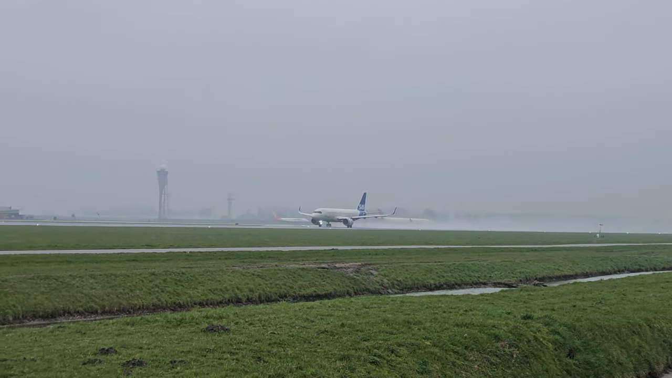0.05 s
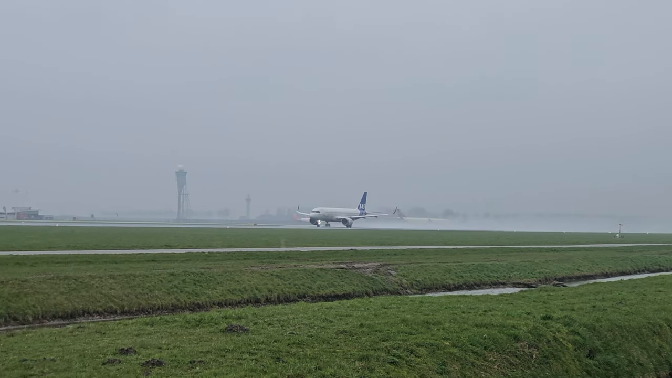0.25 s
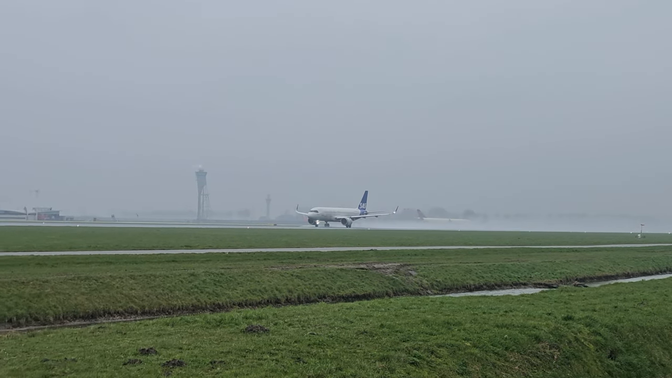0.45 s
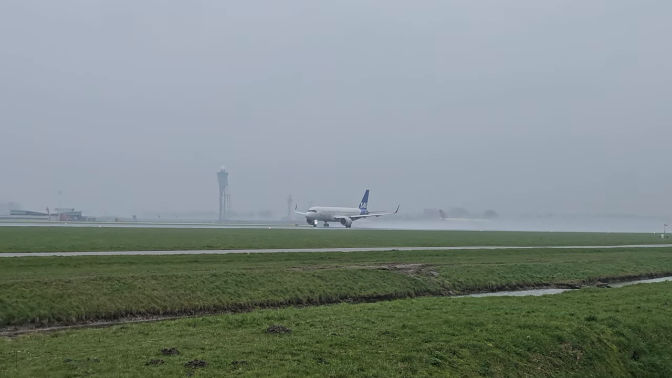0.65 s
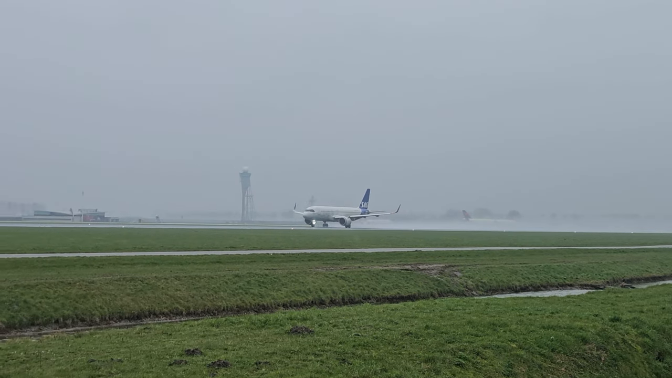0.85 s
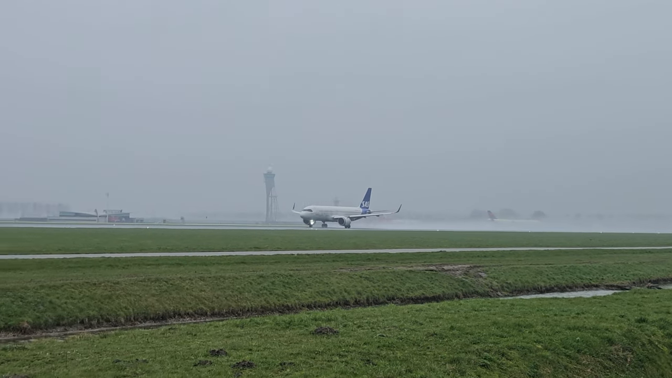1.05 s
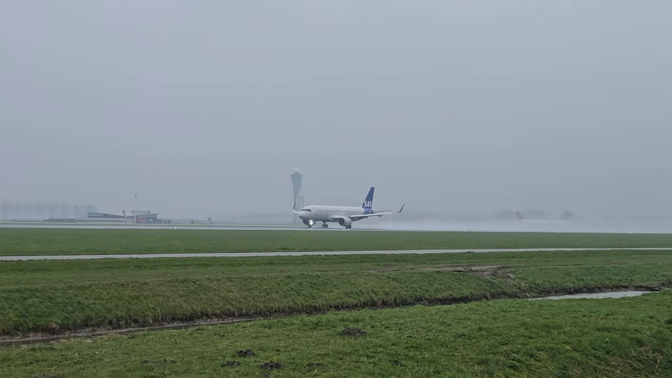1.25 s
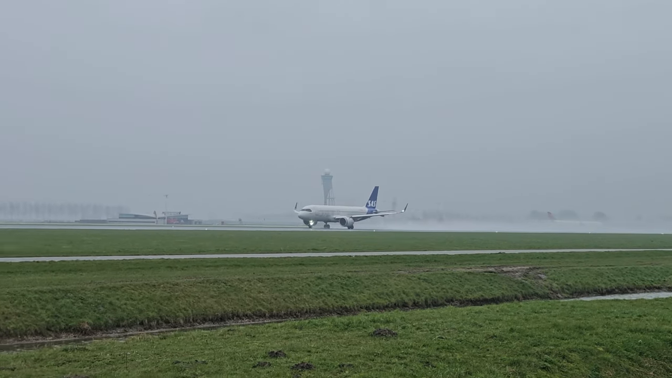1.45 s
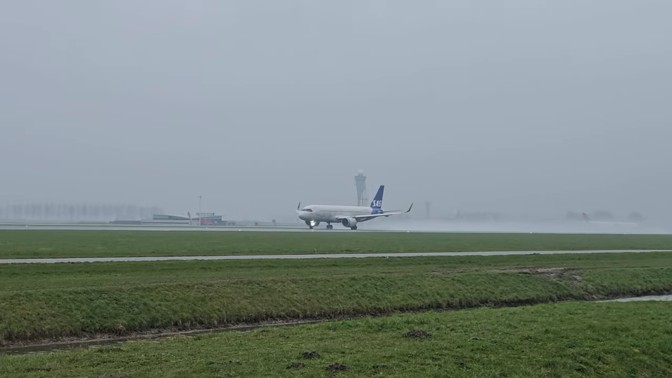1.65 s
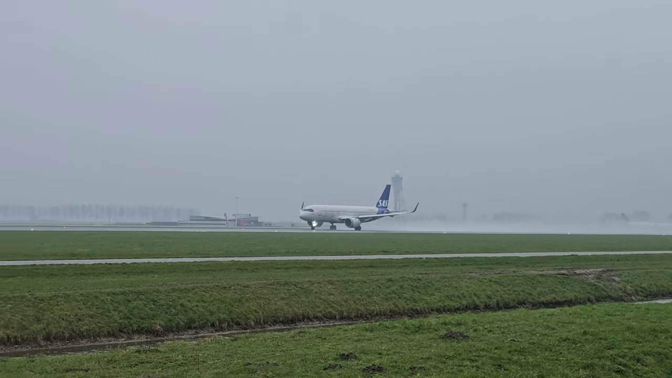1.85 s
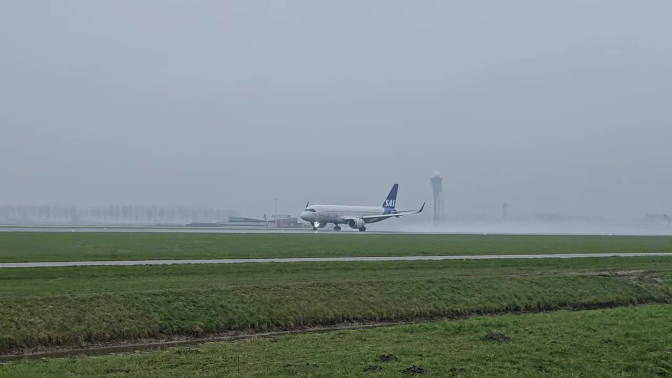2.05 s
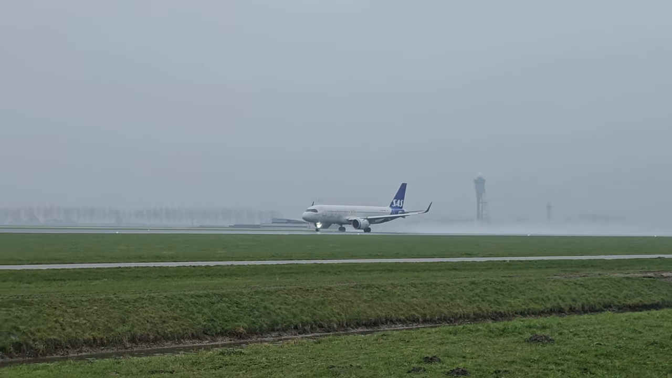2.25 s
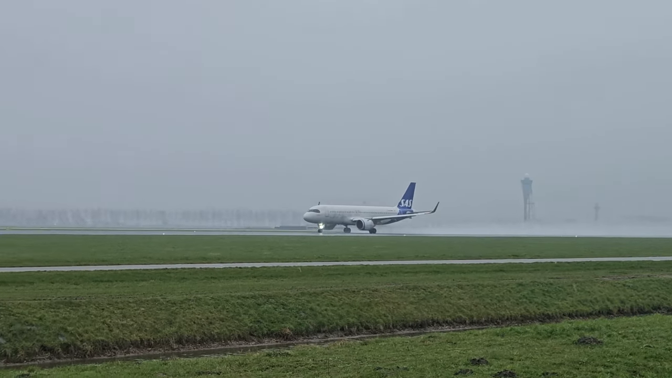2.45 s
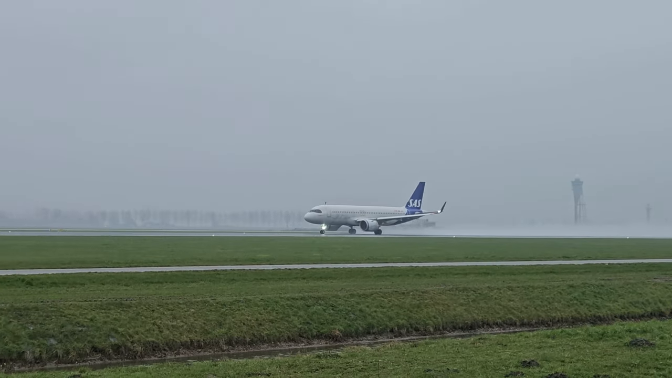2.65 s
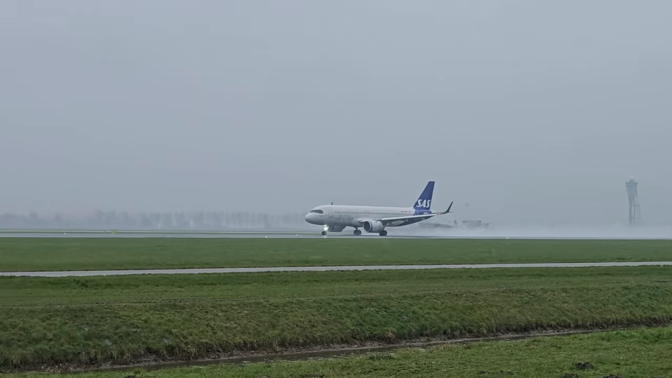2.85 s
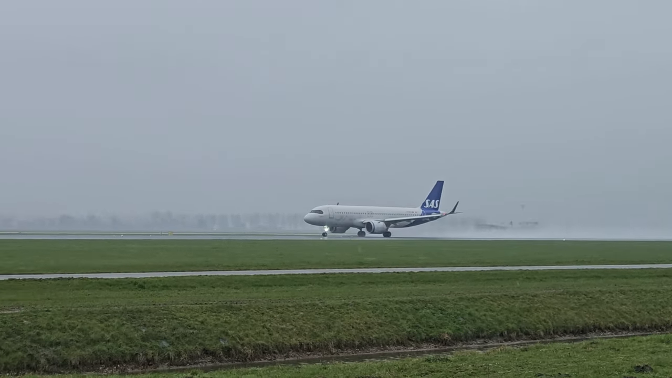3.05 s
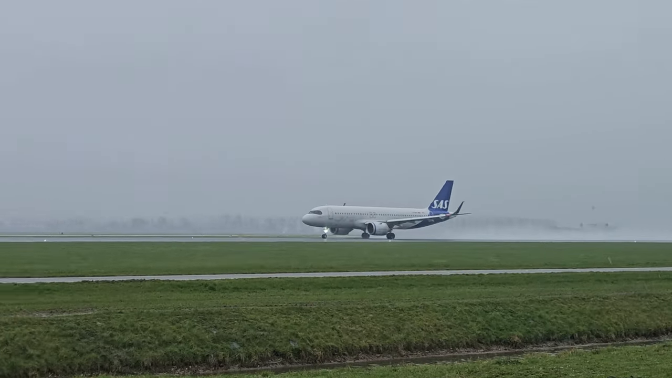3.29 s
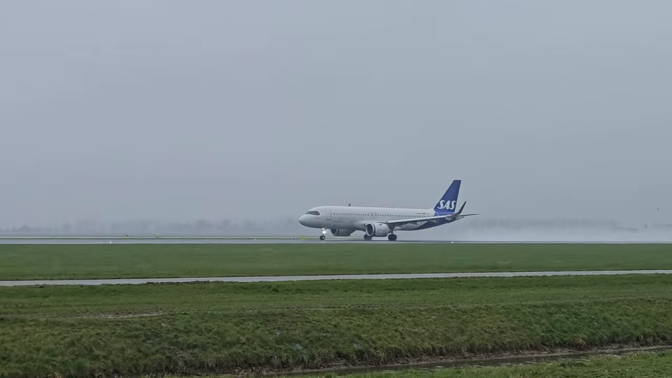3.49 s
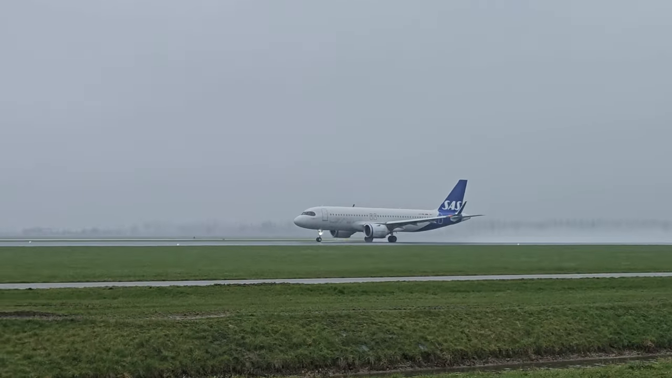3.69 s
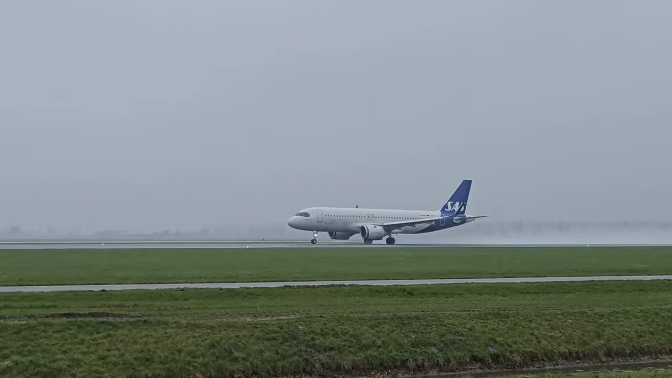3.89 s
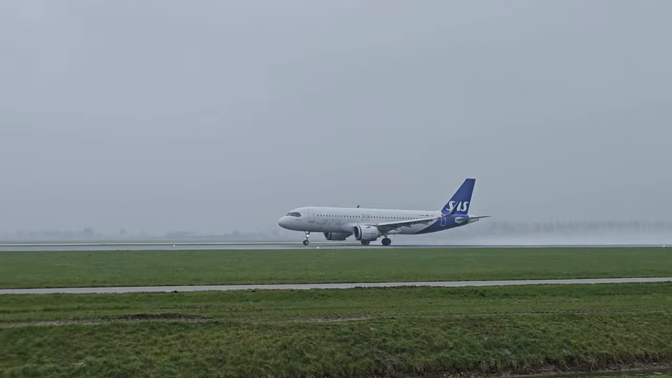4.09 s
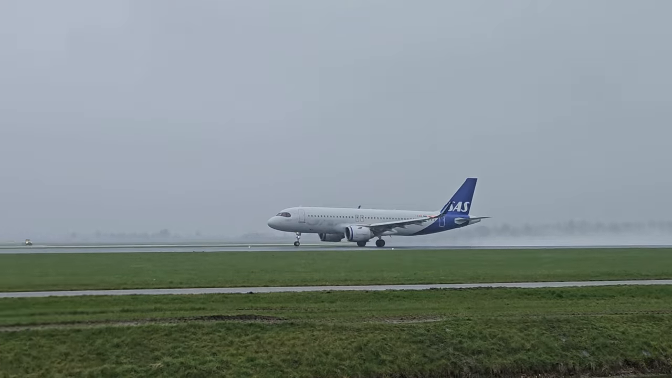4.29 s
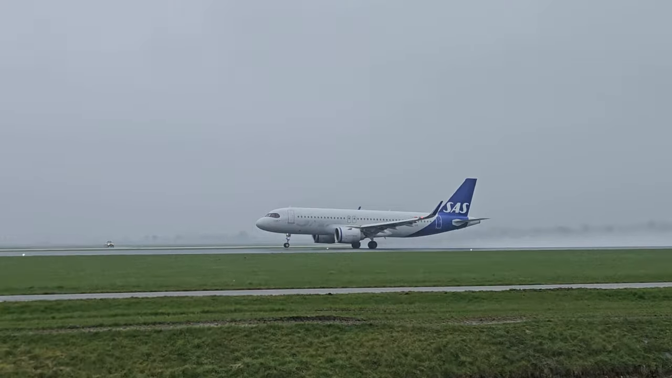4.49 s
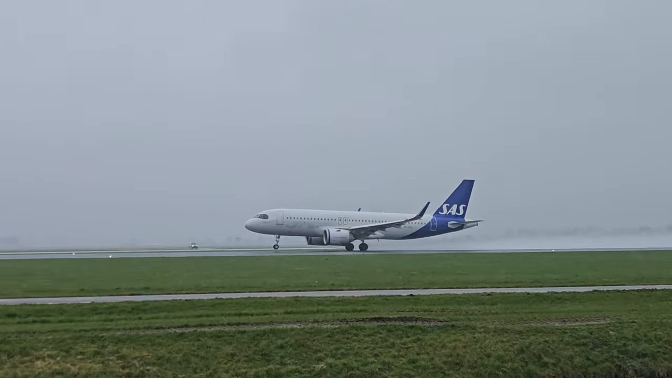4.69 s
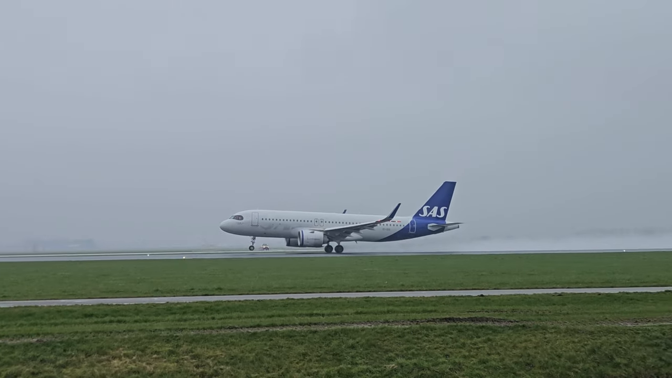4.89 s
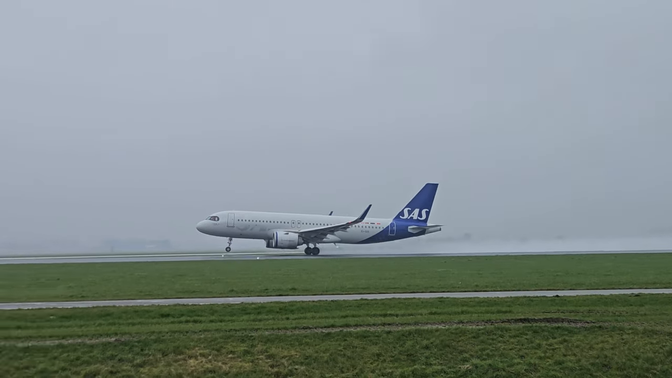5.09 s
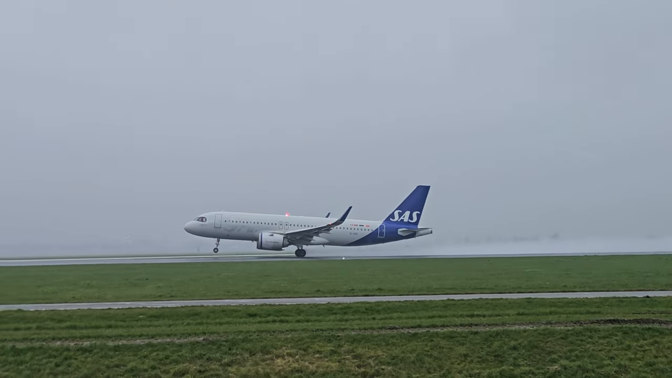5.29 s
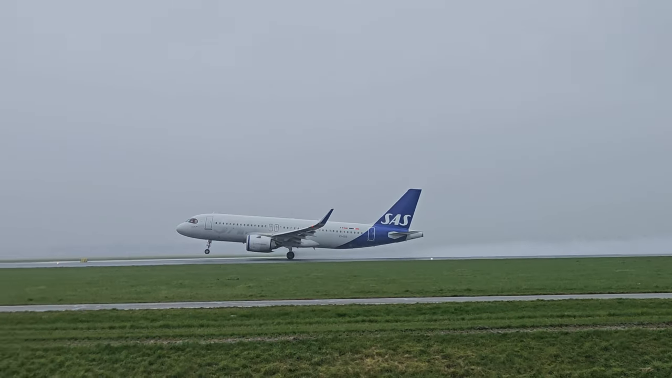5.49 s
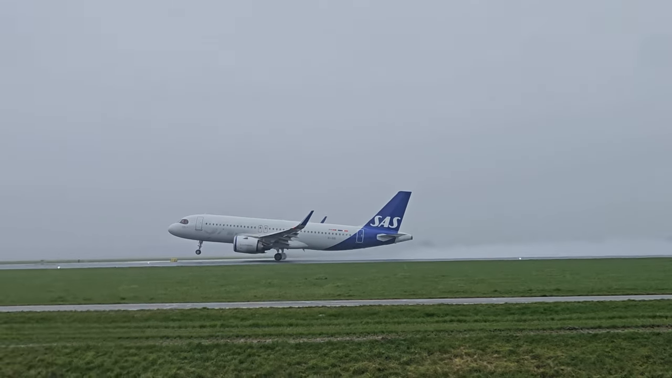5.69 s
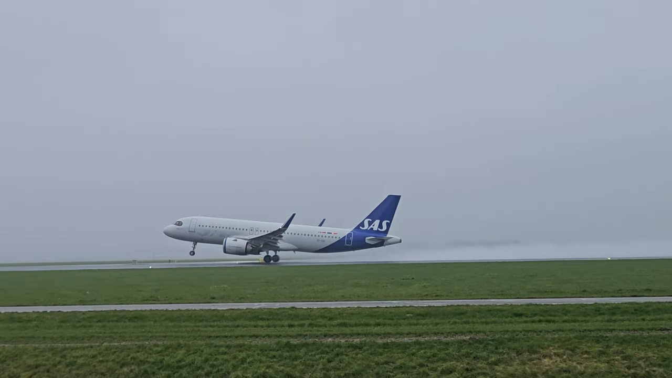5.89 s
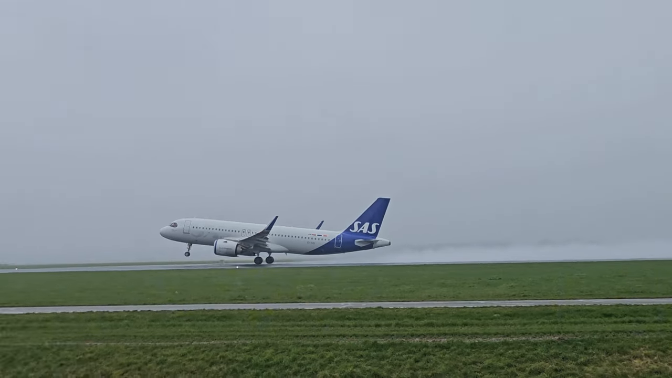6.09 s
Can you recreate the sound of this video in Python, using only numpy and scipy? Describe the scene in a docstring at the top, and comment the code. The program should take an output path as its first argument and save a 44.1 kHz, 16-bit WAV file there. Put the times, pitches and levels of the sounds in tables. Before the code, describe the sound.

Across a windy field, a jet's whining, hissing takeoff run grows louder and brighter toward the pass, over low wind rumble and a few drop ticks.

```python
"""Across a field from a wet runway, in wind and drizzle, a twin-engine airliner rolls past at takeoff thrust.
Fan tones sink by Doppler shift; fan hiss, shaped noise, swells and brightens as less air lies in the way.
Compressor and turbine lines, a narrow combustion hum and the broadband roar of the jets join them.
Wind noise buffets two microphone ports; a few damped pulses are raindrops on the left one.
The airliner sounds muffled and blurred in the left channel."""
import sys
import numpy as np
from scipy import signal
from scipy.fft import rfft, irfft
from scipy.io import wavfile
from scipy.ndimage import uniform_filter1d, minimum_filter1d

SR = 44100
rng = np.random.default_rng(int(sys.argv[2]) if len(sys.argv) > 2 else 0)


def transcribe(u):
    """Save the signal u as a 16-bit wav file named by the first command-line argument.

    u: samples, shape (n,) or (channels, n), limited to [-1, 1]; the rate is SR.
    q: integer samples, one column per channel.
    """
    v = np.clip(np.atleast_2d(u).T, -1, 1)
    q = np.round(v * 32767).astype(np.int16)
    wavfile.write(sys.argv[1], SR, q)


N = 270774
TIME = np.arange(N) / SR  # s

# Engine lines. Each row: multiple of the blade tone, width of the scattered part in Hz,
# then level in dB relative to the hiss from ahead, obliquely and from the side.
ENGINE_LINES = [(3, 77, -2.5, -2.5, -16), (4, 89, 2.5, 0.5, -11), (4.69, 62, -4, -6.5, -10),
                (5, 105, 5.5, -1, -9), (5.7, 64, -3.5, -3, -6), (6, 140, 5, 2, -7),
                (6.7, 74, -5.5, -7.5, -22), (7, 47, 3.5, 3, -21), (7.71, 84, -6, 1.5, -13),
                (8, 70, -3, -2, -20)]
# Emitted fan hiss in three directions. Each row: frequency in Hz, density in dB per Hz relative to the layer.
HISS_AHEAD = [(300, -71), (800, -46.5), (1200, -36.5), (2000, -30.5), (2300, -31.5), (2900, -27),
              (3500, -24.5), (4050, -24.5), (4700, -24), (5500, -26), (6600, -21.5), (9000, -23)]
HISS_OBLIQUE = [(300, -65.5), (900, -44), (1400, -36.5), (1800, -41), (2110, -24.5), (2450, -39),
                (2900, -27.5), (3500, -28.5), (4300, -23.5), (5000, -25), (5700, -25.5), (6600, -24),
                (9000, -15.5)]
HISS_SIDE = [(300, -50), (900, -33), (1400, -37), (1800, -31), (2150, -33.5), (2800, -31), (3700, -28),
             (4750, -26.5), (5500, -27), (6600, -26), (7500, -28.5), (9000, -23.5)]
# Jet noise with its ground reflection. Each row: frequency in Hz, density in dB per Hz relative to the layer.
JET_SPECTRUM = [(30, -9.5), (55, -2), (110, -28.5), (150, -10), (205, -12), (270, -15), (330, -19.5),
                (420, -23.5), (520, -23.5), (680, -18), (800, -19.5), (1100, -23), (1600, -26.5),
                (3000, -32), (8000, -75.5)]
# Directivity of each source. Each holds: level abeam without the lobe in dB,
# gain from nose to tail in dB per degree, extra level in the sideways lobe in dB.
HISS_DIRECTIVITY = (-28, .28, 8.95)
ROAR_DIRECTIVITY = (-36.5, 0.25, 0.46)
BLADE_DIRECTIVITY = (-30.5, 0.12, 2.8)
OCTAVE_DIRECTIVITY = (-26.6, 0.42, 0.88)
HUM_DIRECTIVITY = (-26.5, 0.3, -.5)
TURBINE_DIRECTIVITY = (-31.5, .62, 15)
# Swells and fades on the way through uneven air. Each row: centre in seconds, half length in seconds,
# then change in dB of the hiss, blade tone, octave and hum.
AIR_SWELLS = [(2.7, 0.42, 2, 1, -2, 4), (3.52, 0.31, -0.9, 3, -4.5, -0.5), (3.85, 0.12, -0.5, -5.5, -4, 9),
              (4.03, 0.16, -.5, 3.5, 2.5, 5), (4.31, 0.19, 6, 5, 0.5, -2), (4.71, 0.18, -3, -5, -4.5, -2.5),
              (4.89, 0.063, 1, -11, -10, 2.5), (5.08, 0.066, -2, -1, 0, 5.5),
              (5.28, 0.087, 0.3, -3.5, -11, 5), (5.81, 0.11, 0.5, -0.5, 1, -13),
              (6.07, 0.2, -1, -0.5, 2, 0.5)]
# Wind pressure on a port. Each row: frequency in Hz, density in dB per Hz relative to the layer.
WIND_SPECTRUM = [(10, -46), (28, -35), (45, -21), (62, -15.5), (100, -20.5), (135, -26.5), (200, -34.5),
                 (300, -48), (450, -57), (900, -75.5), (6000, -135)]
# Gusts on the ports. Each row: centre in seconds, half length in seconds, change of level in dB,
# further change of the upper bass in dB.
WIND_GUSTS = [(.29, .035, 7.5, -2), (.61, 0.037, 6.5, -2), (1.2, 0.017, 5.5, 9), (1.35, 0.071, 4.5, 1.5),
              (1.68, 0.096, 6.5, 4), (1.92, 0.082, 4, -5.5), (2.1, 0.037, -1, 2), (2.42, 0.057, 5.5, -4),
              (2.7, 0.098, 2, 0.5), (3.02, 0.076, 3.5, 1), (3.38, 0.042, 6.5, 5), (3.8, .08, 3.5, -7.5),
              (4.05, 0.087, 2, 9), (4.21, 0.097, 4.5, 8), (4.72, .07, 4.5, -5), (4.9, 0.044, 4, 5),
              (5.2, 0.15, 2, 10), (5.78, .06, 1, -15), (6.03, 0.028, 7.5, -14)]
# Raindrops on the left port. Each row: start in seconds, level in dB, ring in Hz, cycles rung.
RAINDROPS = [(.9411, -26, 2100, 1.6), (1.2205, -24, 680, 1.9), (1.4147, 0.8, 1900, 0.92),
             (4.9363, 6, 2450, 0.67)]
# Overall tone colour of the left and right channels. Each row: frequency in Hz, gain in dB.
LEFT_COLOUR = [(250, 1), (600, -5.5), (1000, -6.5), (1600, -11), (2400, -12.5), (3000, -25.5), (3500, -27),
               (4200, -44), (5000, -39.5), (6100, -28), (7300, -35), (8200, -59.5), (16000, -66.5)]
RIGHT_COLOUR = [(250, -0.5), (6000, 0.5), (7500, 0), (8500, -4), (9200, -19), (10200, -38), (11300, -33.5),
                (12700, -19), (15000, -31)]

FAN_HZ = 912.1  # blade tone without Doppler shift
ABEAM_S, CLOSEST_M, SPEED_M_S, ACCEL_M_S2 = 5.533, 260.8, 92.7, 4.21  # moment abeam; distance, speed then
SOUND_M_S = 343
SPECTRA_AT_HZ = 880  # heard blade tone at which the engine spectra hold unshifted
LOBE_DEG, LOBE_WIDTH_DEG = 90.5, 12.24  # angle off the nose
WIND_DB, WIND_PEAK_S = -18.5, 4.41  # breeze at its peak, before gusts and port balance
FRESHEN_DB_PER_S, EASE_DB_PER_S = 2, 2
LEFT_LAG = 21  # samples by which the left channel hears the airliner later
RING_HZ, RING_WIDTH_HZ, RING_DB = 4825, 160, -4
TOP_HZ = 15500


def undb(db):
    """Decibel law: converts a level to an amplitude gain."""
    return 10 ** (np.asarray(db) / 20)


def spectrum(points, hz):
    """Spectral envelope: levels in dB joined by straight lines on a log-frequency axis."""
    f, db = np.transpose(points)
    return np.interp(np.log(hz + 1), np.log(f), db)


def coloured_noise(density_db, size=1024):
    """Spectral shaping: white noise is weighted to the dB per Hz given by density_db(hz, t)."""
    overlap = size - size // 4
    hz, t, cells = signal.stft(rng.standard_normal(N), SR, nperseg=size, noverlap=overlap)
    cells = cells * undb(density_db(hz[:, None], t)) * np.sqrt(SR / 2)
    return signal.istft(cells, SR, nperseg=size, noverlap=overlap)[1][:N]


def walk(rate):
    """Low-passed noise: a smooth random course of spread 1, changing about rate times a second."""
    hz = np.arange(N // 2 + 1) * SR / N
    x = irfft(rfft(rng.standard_normal(N)) / (1 + (hz / rate) ** 2), N)
    return x / x.std()


def tone(hz, width_hz, steady):
    """Scattering by turbulence: a steady ray plus a random one fade and smear a line of rms 1."""
    scattered = (walk(width_hz / 2) + 1j * walk(width_hz / 2)) / np.sqrt(2)
    carrier = np.exp(2j * np.pi * np.cumsum(hz) / SR)
    return np.real((steady + scattered) * carrier) * np.sqrt(2 / (1 + steady ** 2))


def bumps_db(rows, t, order):
    """Superposition: bell-shaped rises or dips in dB, as high as column number order says."""
    return sum(row[order] * np.exp(-((t - row[0]) / row[1]) ** 2) for row in rows)


def flight(t):
    """Kinematics and Doppler shift: distance in m, angle off the nose in degrees, heard blade tone in Hz."""
    since = t - ABEAM_S
    along = SPEED_M_S * since + ACCEL_M_S2 * since ** 2 / 2
    distance = np.hypot(along, CLOSEST_M)
    closing = -(SPEED_M_S + ACCEL_M_S2 * since) * along / distance
    angle = np.degrees(np.arccos(-along / distance))
    return distance, angle, FAN_HZ * (1 + closing / SOUND_M_S)


def blade_hz(t):
    """Doppler shift: the blade-passing tone as heard."""
    return flight(t)[2]


def emitted(hz, t):
    """Doppler shift undone: where a heard frequency lies in the engine spectra."""
    return hz * SPECTRA_AT_HZ / blade_hz(t)


def beam_db(directivity, t):
    """Spherical spreading and directivity: 1 / distance, a slope from nose to tail and a side lobe."""
    abeam_db, db_per_deg, lobe_db = directivity
    distance, angle, _ = flight(t)
    spreading_db = -20 * np.log10(distance / CLOSEST_M)
    lobe = np.exp(-((angle - LOBE_DEG) / LOBE_WIDTH_DEG) ** 2)
    return abeam_db + spreading_db + db_per_deg * (angle - 90) + lobe_db * lobe


def air_db(hz, t, abeam_loss_db=11.0, loss_db_per_m=0.12):
    """Atmospheric absorption: loss at 8 kHz grows with distance, and as frequency squared up to 12 kHz."""
    steepness = (np.minimum(hz, 12000) / 8000) ** 2
    farther_m = flight(t)[0] - CLOSEST_M
    return -(abeam_loss_db + loss_db_per_m * farther_m) * steepness


def side_view(t, inlet_deg=48, side_deg=90):
    """Aspect of the engines: 0 into the inlets, 1 from the side."""
    return np.clip((flight(t)[1] - inlet_deg) / (side_deg - inlet_deg), 0, 1)


def by_view(t, ahead, oblique, side, oblique_view=0.57):
    """Directivity by aspect: blends three radiation directions as the engines turn side-on."""
    view = side_view(t)
    early = np.clip(view / oblique_view, 0, 1)
    late = np.clip((view - oblique_view) / (1 - oblique_view), 0, 1)
    return ahead + early * (oblique - ahead) + late * (side - oblique)


def hiss_db(t):
    """Radiation and uneven air together: the level of the fan hiss, which the higher tones follow."""
    return beam_db(HISS_DIRECTIVITY, t) + bumps_db(AIR_SWELLS, t, order=2)


def fan_hiss():
    """Broadband blade noise: its colour turns with the aspect, and turbulent air makes it flutter."""
    def density_db(hz, t):
        directions = (HISS_AHEAD, HISS_OBLIQUE, HISS_SIDE)
        colours = [spectrum(points, emitted(hz, t)) for points in directions]
        return by_view(t, *colours) + hiss_db(t) + air_db(hz, t)

    flutter_db = 0.94 * walk(21)
    return coloured_noise(density_db) * undb(flutter_db)


def fan_whine(far_db=-5, far_octave_db=-2):
    """Blade-passing tones and beats: a slower second fan is hidden by the fuselage from the side."""
    hz, in_view = blade_hz(TIME), 1 - side_view(TIME)
    far_hz = 0.972 * hz
    near_blade = tone(hz, width_hz=38, steady=0.94)
    far_blade = undb(far_db) * in_view * tone(far_hz, width_hz=70, steady=0.9)
    near_octave = tone(2 * hz, width_hz=46, steady=0.5)
    far_octave = undb(far_octave_db) * in_view * tone(2 * far_hz, width_hz=64, steady=0.1)
    blade_db = beam_db(BLADE_DIRECTIVITY, TIME) + bumps_db(AIR_SWELLS, TIME, order=3)
    octave_db = beam_db(OCTAVE_DIRECTIVITY, TIME) + bumps_db(AIR_SWELLS, TIME, order=4)
    return undb(blade_db) * (near_blade + far_blade) + undb(octave_db) * (near_octave + far_octave)


def engine_tones(forward_deg=44, forward_db_per_deg=0.36):
    """Rotor lines: fan overtones, compressor lines between them and the turbine whistle."""
    _, angle, hz = flight(TIME)
    # the overtones and compressor lines stand out more the straighter one faces the inlets
    level_db = hiss_db(TIME) + forward_db_per_deg * np.maximum(forward_deg - angle, 0)
    turbine_hz = 8.26 * hz
    turbine_db = beam_db(TURBINE_DIRECTIVITY, TIME) + air_db(turbine_hz, TIME)
    out = undb(turbine_db) * tone(turbine_hz, width_hz=73, steady=0.3)
    for multiple, width_hz, *view_db in ENGINE_LINES:
        line_hz = multiple * hz
        db = level_db + by_view(TIME, *view_db) + air_db(line_hz, TIME)
        # short waves are scattered more, so less of the steady ray survives
        out = out + undb(db) * tone(line_hz, width_hz, steady=0.98 / multiple)
    return out


def jet_roar(bloom_deg=70, bass_lobe_db=2, bass_hz=500):
    """Turbulent mixing: exhaust noise billows over fixed ground-reflection humps; bass blooms before the pass."""
    def density_db(hz, t):
        bloom = np.exp(-((flight(t)[1] - bloom_deg) / LOBE_WIDTH_DEG) ** 2)
        bass = 1 / (1 + (hz / bass_hz) ** 2)
        return spectrum(JET_SPECTRUM, hz) + beam_db(ROAR_DIRECTIVITY, t) + bass_lobe_db * bloom * bass

    billow_db = 1.0 * walk(9.3)
    return undb(billow_db) * coloured_noise(density_db, size=2048)


def core_hum(hum_hz=263):
    """Combustion noise: one narrow low band, at hum_hz for the reference pitch, sinks with the fan tones."""
    db = beam_db(HUM_DIRECTIVITY, TIME) + bumps_db(AIR_SWELLS, TIME, order=5)
    return undb(db) * tone(hum_hz * blade_hz(TIME) / SPECTRA_AT_HZ, width_hz=45, steady=0.25)


def opening(x, dull_hz=650, opens_s=0.14, fade_s=0.076):
    """Low-pass crossfade: the airliner sounds dull for the first moment, then its treble fades in."""
    dull = signal.lfilter(*signal.butter(1, dull_hz, fs=SR), x)
    return dull + np.clip((TIME - opens_s) / fade_s, 0, 1) * (x - dull)


def blur(x, db=-5, t60=0.39, corner_hz=2200):
    """Decorrelation: a short noise tail blurs the left channel, most in the treble."""
    t = TIME[:SR // 4]
    tail = rng.standard_normal(len(t)) * np.exp(-np.log(1000) * t / t60)
    treble = signal.lfilter(*signal.butter(1, corner_hz, "high", fs=SR), x)
    return undb(db) * signal.fftconvolve(treble, tail / np.linalg.norm(tail))[:N]


def ringing(x):
    """Resonance: a narrow ring of the right port stays put while the engine tones slide through it."""
    b, a = signal.iirpeak(RING_HZ, RING_HZ / RING_WIDTH_HZ, fs=SR)
    return x + undb(RING_DB) * signal.lfilter(b, a, x)


def tone_colour(x, colour):
    """Linear filtering: the sound in one channel takes on its overall tone colour."""
    hz = np.arange(N + 1) * SR / (2 * N)
    return irfft(rfft(x, 2 * N) * undb(spectrum(colour, hz)))[:N]


def raindrops(contact_cycles=0.085):
    """Damped oscillation: each drop lands softly and pushes the left port's air for a cycle or two."""
    out = np.zeros((2, N))
    for start, db, hz, cycles in RAINDROPS:
        turns = np.clip((TIME - start) * hz, 0, 10)
        push = np.tanh(turns / contact_cycles) * np.exp(-(turns / cycles) ** 3)
        out[0] += undb(db) * push * np.sin(2 * np.pi * turns)
    return out


def wind(shared_db=-1.4, own_db=-5.5, small_eddies_db=6, left_db=1.45, right_db=-0.74,
         upper_bass_db=-3.5, unrest_db=-0.76):
    """Turbulent pressure: large eddies press on both ports, small ones on each; sharp gusts reach higher."""
    def upper(hz):  # rises from 0 to 1 over the octave above 95 Hz
        return np.clip(np.log2((hz + 1) / 95), 0, 1)

    def density_db(hz, t):
        freshening_db = FRESHEN_DB_PER_S * (t - WIND_PEAK_S)
        easing_db = EASE_DB_PER_S * (WIND_PEAK_S - t)
        breeze_db = WIND_DB + np.minimum(freshening_db, easing_db)
        gust_db = bumps_db(WIND_GUSTS, t, order=2)
        sharpness_db = upper_bass_db + bumps_db(WIND_GUSTS, t, order=3)
        return spectrum(WIND_SPECTRUM, hz) + breeze_db + gust_db + upper(hz) * sharpness_db

    def own_density_db(hz, t):
        return density_db(hz, t) + own_db + small_eddies_db * upper(hz)

    shared = undb(shared_db) * coloured_noise(density_db, size=2048)
    ports = [undb(db) * (shared + coloured_noise(own_density_db, size=2048)) for db in (left_db, right_db)]
    return np.array(ports) * undb(unrest_db * walk(5.6))


def limit(x, size=257):
    """Gain reduction: each channel dips smoothly for a few milliseconds round peaks over full scale."""
    gain = minimum_filter1d(1 / np.maximum(np.abs(x), 1), size)
    return x * uniform_filter1d(uniform_filter1d(gain, size // 2), size // 2)


def scene():
    """Superposition: the airliner is later and blurred in the left channel; wind and rain act on the ports."""
    airliner = opening(fan_hiss() + fan_whine() + engine_tones() + jet_roar() + core_hum())
    later = np.pad(airliner, (LEFT_LAG, 0))[:N] + blur(airliner)
    left = tone_colour(later, LEFT_COLOUR)
    right = tone_colour(ringing(airliner), RIGHT_COLOUR)
    return np.array([left, right]) + wind() + raindrops()


def record(dry, self_noise_db=-76):
    """Transducer limits: faint self-noise is added, peaks are limited and the top is cut."""
    x = limit(dry + undb(self_noise_db) * rng.standard_normal(dry.shape))
    # order 8, 0.2 dB passband ripple, 70 dB stopband
    return signal.sosfilt(signal.ellip(8, 0.2, 70, TOP_HZ, fs=SR, output="sos"), x)


dry = scene()
out = record(dry)
transcribe(out)
```